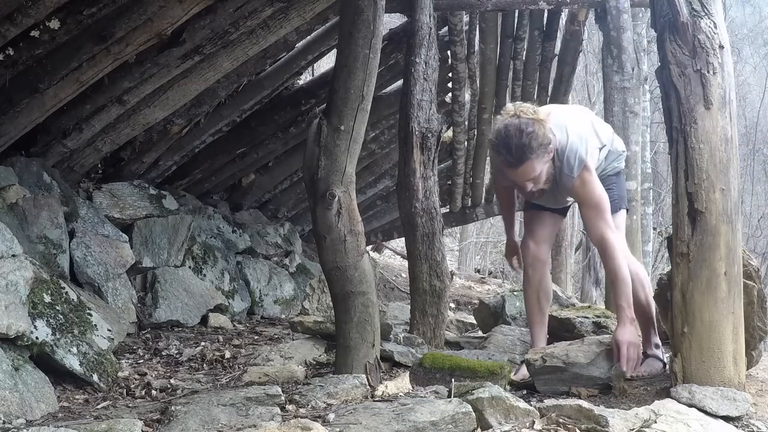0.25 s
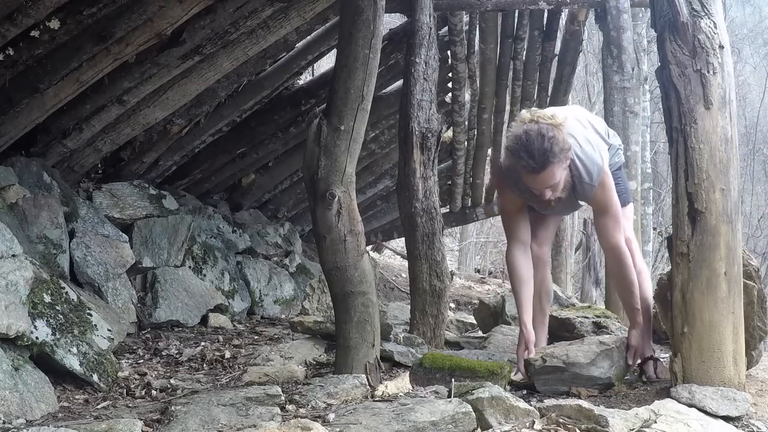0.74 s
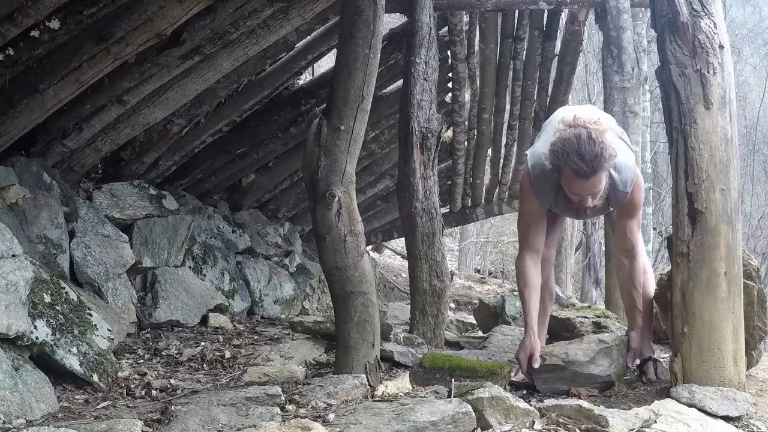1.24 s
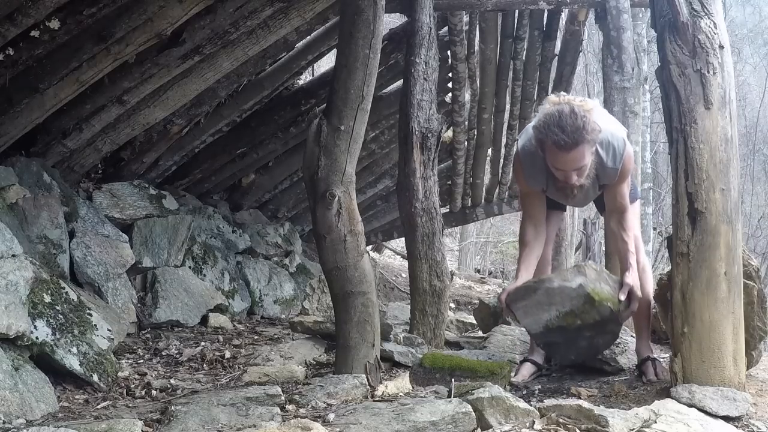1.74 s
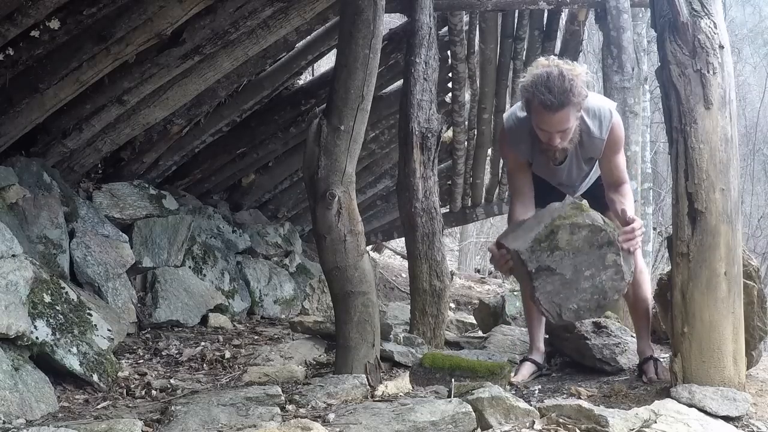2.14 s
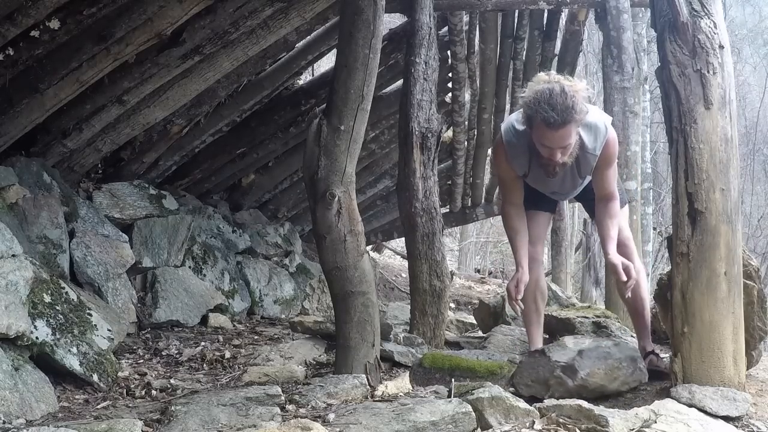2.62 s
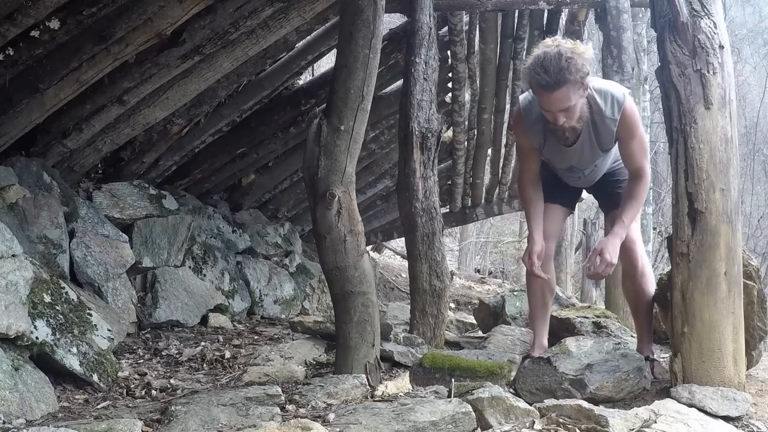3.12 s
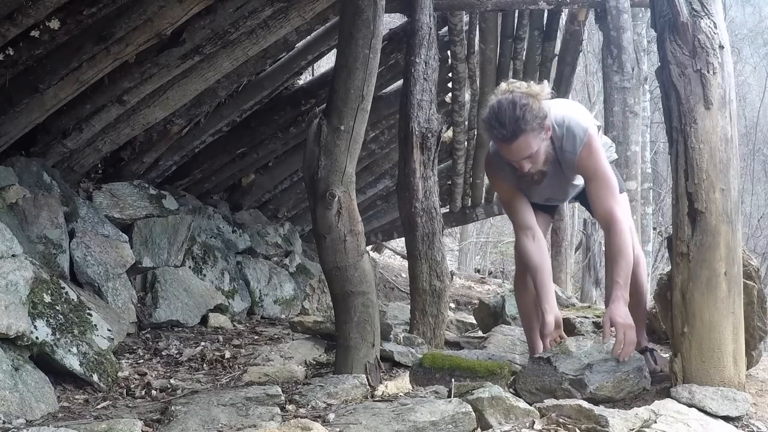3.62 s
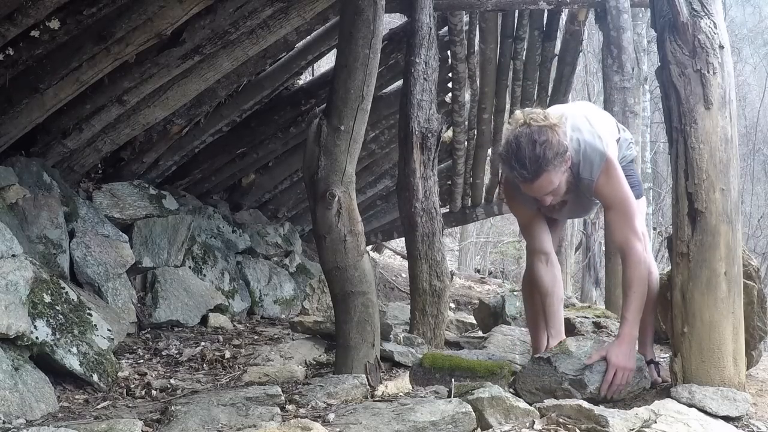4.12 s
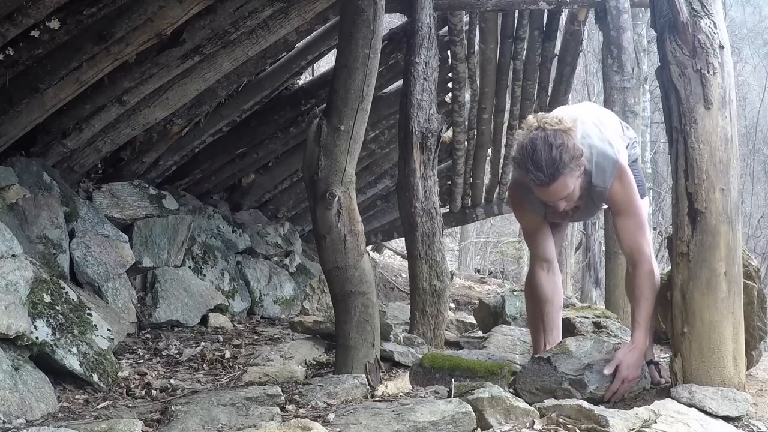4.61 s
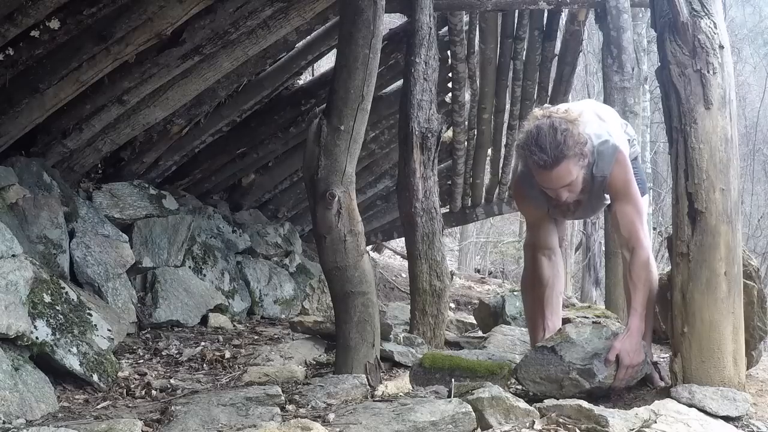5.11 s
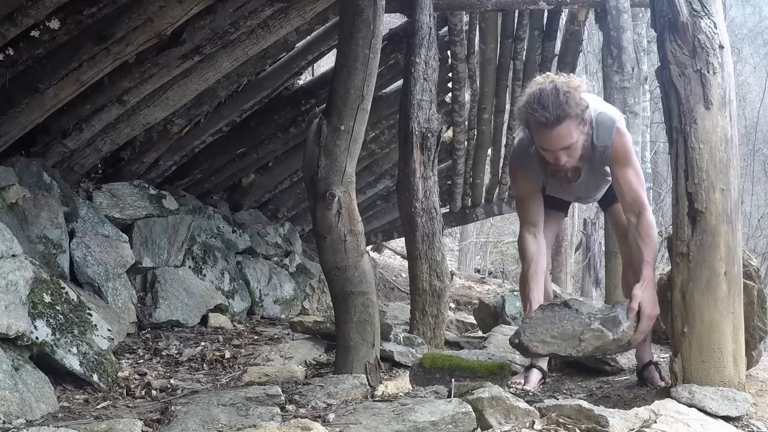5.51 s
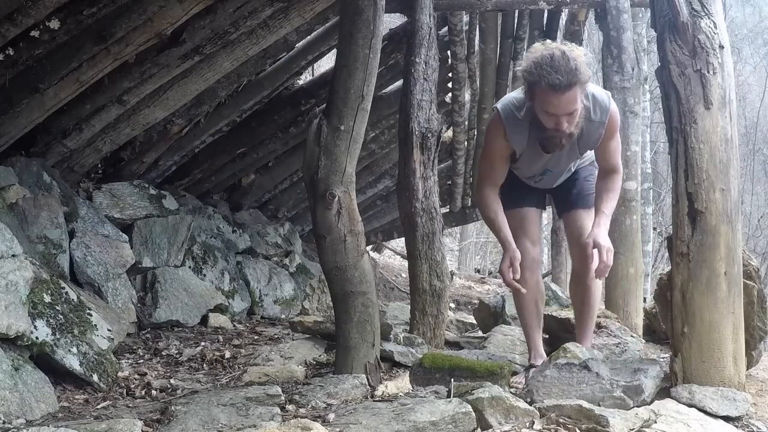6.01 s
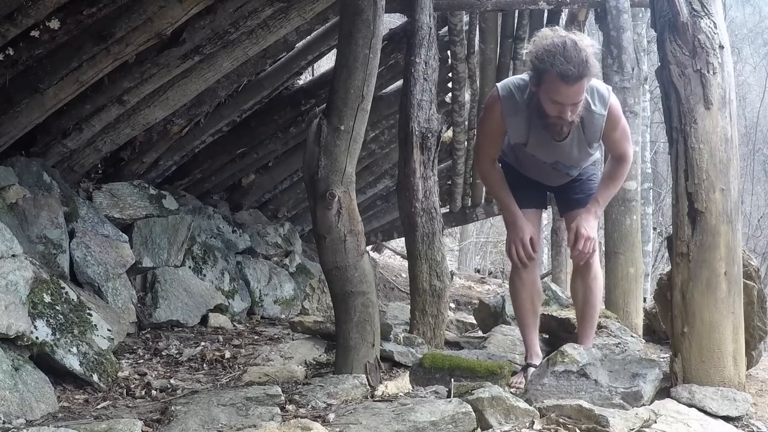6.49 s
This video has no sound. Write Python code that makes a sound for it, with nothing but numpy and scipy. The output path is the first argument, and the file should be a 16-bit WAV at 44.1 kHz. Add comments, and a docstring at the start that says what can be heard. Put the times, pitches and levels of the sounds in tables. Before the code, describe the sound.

A heavy stone falls twice onto flat rocks and gritty soil with sharp knocks and crunches, over quiet forest air.

```python
"""Heavy stone tipped over

A heavy stone falls twice onto flat rocks and gritty soil under a lean-to of logs. Each fall crunches
into the grit, knocks a short ring out of a slab and shakes the ground; the stone rocks and settles.
Sandals shuffle and pebbles tick; far birds whistle over quiet forest air and a faint electronic whine."""
import sys
import numpy as np
from scipy import signal
from scipy.fft import rfft, irfft
from scipy.io import wavfile

SR = 44100
rng = np.random.default_rng(int(sys.argv[2]) if len(sys.argv) > 2 else 0)


def int16_out(signal):
    """Quantize to a 16-bit WAV file."""
    q = np.round(np.clip(np.atleast_2d(signal).T, -1, 1) * 32767)
    wavfile.write(sys.argv[1], SR, q.astype(np.int16))


N = 297675
TIME = np.arange(N) / SR
AGE = TIME[:SR]  # the first second after a blow

# the stone hits a slab: (time [s], ring [dB], crack [dB], base crack t60 [s], snap [dB])
SLAB_HITS = [(2.3756, -19.5, -21.5, 0.07, -12), (5.7333, -28.5, -34, 0.072, -42)]
# ring of the slab, one set of modes per hit: (frequency [Hz], relative level [dB], t60 [s])
SLAB_MODES = [
    [(620, -19.5, 0.084), (854, -9, 0.039), (937, -0.5, 0.034), (1054, 3.5, 0.036), (1204, -21, 0.13),
     (2040, -5.5, 0.038), (2150, -11, 0.023), (2510, -11.5, 0.066), (3366, -4, 0.038), (3810, -6.5, 0.055),
     (5090, -13.5, 0.085), (5150, -3, 0.025), (6430, -1, 0.02), (8050, -18, 0.061)],
    [(419, -11, 0.14), (883, 6, 0.022), (1228, 2.5, 0.038), (1544, -6, 0.083), (1860, -22, 0.071),
     (1940, -17, 0.044), (2470, -10, 0.045), (2820, -5, 0.037), (3052, -7, 0.036), (3800, -5.5, 0.032)],
]
# EQ of each crack, a sharp edge first, then a blunt face: (frequency [Hz], relative level [dB])
CRACK_EQS = [
    [(100, -8), (400, -5.5), (1000, 5.5), (1500, -5.5), (2200, -5), (4000, -6), (6300, -4), (7200, -6),
     (8700, 1), (10300, -10), (15000, -11.5)],
    [(100, -1), (400, 2.5), (1400, 2), (2300, -2.5), (3600, -18), (5500, -22), (8500, -29), (10300, -29),
     (15000, -26)],
]
# the stone's own modes, a snap at first contact: (frequency [Hz], relative level [dB], t60 [s])
SNAP_MODES = [(3950, -3.5, 0.0072), (4930, 4, 0.0028), (6390, -1.5, 0.0058), (8230, -4, 0.011),
              (13160, -8.5, 0.0078)]
def knocks(crack_attack_s=0.00057, ring_attack_s=0.0025):
    """Stone on stone: a snap, a crack thickened by the close walls, and the short ring of the slab."""
    out = np.zeros(N)
    for (s, ring_db, crack_db, t60, snap_db), modes, eq in zip(SLAB_HITS, SLAB_MODES, CRACK_EQS):
        noise = colour(rng.standard_normal(SR), eq)
        body = signal.sosfilt(signal.butter(1, 4000, fs=SR, output="sos"), noise)
        crack = body * fade(1.63 * t60) + (noise - body) * fade(0.51 * t60)  # the treble dies first
        transient = undb(crack_db) * crack + undb(snap_db) * ring(SNAP_MODES)
        add(out, s, transient * attack(crack_attack_s))
        add(out, s, undb(ring_db) * ring(modes) * attack(ring_attack_s))
    return out


# the weight sinks into the soil: (time [s], wobble [dB], bounce [dB], bounce pitch [Hz], thump [dB])
FALLS = [(2.367, -29.5, -34, 52, -28), (5.736, -31, -29, 56, -37.5)]
# thump of packed soil: (frequency [Hz], relative level [dB], t60 [s])
THUMP_MODES = [(99, -8, 0.21), (128, -4.5, 0.12), (168, 1.5, 0.065), (200, -4, 0.033)]
# sub-bass wobble of the microphone stand: (frequency [Hz], relative level [dB], t60 [s])
STAND_MODES = [(29.76, 3, 0.39), (26.14, -9.5, 1.1), (44.3, -34, 2.1)]
def ground(attack_s=0.0038, bounce_t60=0.25):
    """The low end: each fall thumps the soil, which springs back, and jolts the microphone stand."""
    out = np.zeros(N)
    for s, wobble_db, bounce_db, bounce_hz, thump_db in FALLS:
        thump = undb(thump_db) * ring(THUMP_MODES)
        wobble = undb(wobble_db) * ring(STAND_MODES)
        bounce = ring([(bounce_hz, bounce_db, bounce_t60)])
        add(out, s, attack(attack_s) * (thump - wobble - bounce))
    return out


# the hollow under the stone: (frequency [Hz], relative level [dB], t60 [s])
HOLLOW_MODES = [(343, -6, 0.12), (390, 0, 0.057), (433, -8.5, 0.076), (540, -10.5, 0.083)]
def belly_bump(start_s=5.8192, level_db=-26, closing_s=0.017, choke_db=-7, attack_s=0.00034):
    """The stone rocks back onto its belly with a hollow bump, choked as the gap below it closes."""
    out = np.zeros(N)
    closed = 1 - np.exp(-(AGE / closing_s) ** 4)
    hollow = sum(ring([mode]) for mode in HOLLOW_MODES)  # all modes start in phase
    add(out, start_s, undb(level_db + choke_db * closed) * attack(attack_s) * hollow)
    return out


# the stone crushes grit, fast in, slow out: (time [s], level [dB], tilt [dB/octave], t60 [s])
CRUNCHES = [(1.341, -68.5, 6, 0.18), (1.405, -61.5, 5, 0.1), (2.361, -37, 1, 0.29), (2.764, -59, 0, 0.4),
            (5.719, -47.5, -0.4, 0.98), (5.805, -44, -0.5, 0.24)]
# sandals and stone slide over grit: (peak time [s], length [s], level [dB], tilt [dB/octave])
SCRAPES = [(0.073, 0.15, -65, -1.5), (0.453, 0.5, -70.5, -2), (1.74, 0.21, -64, -1),
           (2.152, 0.06, -59.5, 1.5), (2.315, .16, -68, 2), (2.584, 0.19, -57.5, 2), (2.667, 0.13, -58, -2),
           (3.485, 0.9, -68, -1.5), (4.875, 0.17, -70, -1), (5.637, 0.086, -55.5, 1.5),
           (5.916, 0.16, -56, -1.4), (6.122, 0.084, -55, -1.5), (6.252, 0.53, -64.5, -1.9)]
def grit_moves(crunch_attack_s=0.0021, edge_db=-6.5, swell_shape=1.35):
    """How hard each crunch and scrape works the grit, as (start time, envelope, tilt)."""
    moves = [(s, undb(db) * attack(crunch_attack_s) * fade(t60), tilt) for s, db, tilt, t60 in CRUNCHES]
    for s, length, db, tilt in SCRAPES:
        t = TIME[abs(TIME - s) < 2 * length]
        from_peak = abs(2 * (t - s) / length)
        swell = undb(db + edge_db * from_peak ** swell_shape)  # shape 1 is pointed, 2 is round
        moves.append((t[0], swell, tilt))
    return moves


# EQ of the grit: (frequency [Hz], relative level [dB])
GRIT_EQ = [(60, -6.5), (300, -6.5), (1000, 1.5), (2000, 0.5), (4000, -1), (6500, -5), (8800, -3),
           (10500, -12), (15000, -10.5)]
def grit(grains_per_s=1400, scatter_db=2.5, pivot_hz=3500):
    """Dense tiny cracks of sand and dry leaves; loose grains sound brighter than packed soil."""
    sizes = undb(scatter_db * np.minimum(rng.exponential(size=N), 5)) * rng.choice([-1, 1], N)
    grains = unit(sizes * (rng.random(N) < grains_per_s / SR))
    spectrum = rfft(colour(grains + rng.standard_normal(N), GRIT_EQ))
    octave = np.log2(np.clip(np.fft.rfftfreq(N, 1 / SR), 250, 16000))
    out, moves = np.zeros(N), grit_moves()
    # each octave band rides its own envelope, so every move has its own brightness
    for centre in np.arange(octave[0], octave[-1] + .5):
        texture = irfft(spectrum * np.maximum(1 - abs(octave - centre), 0), N)
        power = np.zeros(N)
        for s, envelope, tilt in moves:
            add(power, s, (envelope * undb(tilt * (centre - np.log2(pivot_hz)))) ** 2)
        out += texture * np.sqrt(power)
    return out


# pebbles, twigs and shifts of the stone: (time [s], level [dB], centre [Hz], width [octaves], t60 [s])
TICKS = [(0.554, -54, 1880, .9, 0.075), (1.339, -53, 535, 1.5, 0.17), (1.403, -54.5, 690, 1.6, 0.14),
         (1.423, -56, 900, 0.99, .06), (2.292, -48, 5140, 2.2, 0.024), (2.3063, -46, 4870, 1.14, .065),
         (2.361, -37, 720, 2, 0.12), (2.387, -30, 1100, 3, 0.03), (2.403, -34.5, 1310, 3.3, 0.07),
         (2.486, -48, 516, 1.85, 0.19), (2.494, -50, 1000, 0.62, 0.053), (2.625, -50, 3230, 1.8, .04),
         (2.672, -50, 1040, 2, 0.17), (2.754, -52.5, 6000, 3.5, 0.057), (2.765, -48.5, 1080, 1.2, 0.05),
         (2.977, -63, 6050, 1.3, 0.064), (3.369, -58, 2390, 1.9, 0.11), (3.509, -53.5, 2830, 2.3, 0.12),
         (3.766, -56, 1950, 1.2, 0.094), (4.052, -63, 3380, 1, 0.068), (5.742, -36.5, 2620, 1.4, 0.045),
         (5.788, -38, 386, 0.95, 0.064), (5.8165, -40.5, 900, 1.3, 0.078), (5.882, -43.5, 2730, 1.4, .028),
         (5.922, -48.5, 443, 2.5, 0.061), (6.191, -46.5, 1600, 1.46, 0.059), (6.421, -62.5, 5000, 2, 0.14)]
def ticks(litter_count=12, litter_db=-67.5, litter_hz=2600, litter_octaves=1.6, litter_t60=0.066):
    """Small contacts: brief bursts, higher for smaller pieces; faint litter ticks at random."""
    out = np.zeros(N)
    litter = [(when * TIME[-1], litter_db + 2 * size, litter_hz * 2 ** (pitch - .5),
               litter_octaves, litter_t60) for when, size, pitch in rng.random((litter_count, 3))]
    for s, db, hz, octaves, t60 in TICKS + litter:
        envelope = attack(1 / hz) * fade(t60)  # bigger, lower pieces speak more slowly
        add(out, s, undb(db) * band(SR, hz, octaves) * envelope)
    return out


# the stone is heaved over: (time [s], length [s], start pitch [Hz], end pitch [Hz], level [dB])
RASPS = [(1.67, .18, 2150, 2414, -71), (5.575, 0.072, 1600, 3020, -61.5)]
def rasps(width_octaves=0.2):
    """The stone's rough edge scrapes with a resonance that rises as it speeds up."""
    return glides(RASPS, width_octaves)


def shelter(x, wet_db=-23, t60=0.2, build_s=0.0014):
    """Logs and dry-stone wall scatter a short, dull tail."""
    tail_eq = [(80, 4.5), (500, -1.5), (3000, -15.5), (8000, -5.0), (15000, -18)]
    tail = colour(rng.standard_normal(SR), tail_eq) * fade(t60) * attack(build_s)
    return x + undb(wet_db) * signal.fftconvolve(x, tail / np.linalg.norm(tail))[:N]


# far bird calls: (time [s], length [s], start pitch [Hz], end pitch [Hz], level [dB])
BIRD_CALLS = [(0.117, 0.12, 2570, 2800, -72), (0.075, 0.49, 4320, 4240, -79),
              (0.149, 0.75, 1640, 1635, -79), (3.212, 0.27, 4200, 4300, -78), (3.794, 0.1, 3150, 3700, -80),
              (5.901, 0.62, 3180, 3230, -74.5), (6.38, 0.58, 5620, 5840, -80)]
def birds(smear_octaves=0.029):
    """Thin gliding whistles, smeared by their way through the trees."""
    return glides(BIRD_CALLS, smear_octaves)


# partials of the whine: (harmonic [number], level [dB])
WHINE_HARMONICS = [(1, -81.5), (2, -81.5), (3, -80.5)]
def whine(pitch_hz=4744, waver=0.012, waver_hz=45):
    """A thin electronic whine whose pitch trembles."""
    pitch = pitch_hz * (1 + waver * band(N, waver_hz, octaves=2.35))
    phase = 2 * np.pi * np.cumsum(pitch) / SR
    return sum(undb(db) * unit(np.sin(k * phase)) for k, db in WHINE_HARMONICS)


# EQ of the forest bed: (frequency [Hz], relative level [dB])
AIR_EQ = [(12, -38), (20, 3), (54, 0), (139, -5.5), (263, -10), (294, -10), (387, -9.5), (1270, -12),
          (3090, -19), (4690, -21.5), (5240, -22), (9370, -21), (10800, -22.5), (15000, -20.5)]
def forest_air(level_db=-67):
    """Still forest air: a steady bed of noise, heaviest in the lows."""
    return undb(level_db) * colour(rng.standard_normal(N), AIR_EQ)


# EQ of the stereo hiss: (frequency [Hz], relative level [dB])
HISS_EQ = [(12, -27), (20, 6.5), (294, 3.5), (433, 5.5), (1510, -5), (3860, 1.5), (11100, 1.5),
           (15000, -39)]
def wide_hiss(level_db=-82):
    """A trace of hiss, opposite in polarity left and right, for width."""
    return undb(level_db) * colour(rng.standard_normal(N), HISS_EQ) * np.array([[1], [-1]])


def undb(db):
    """Decibels to gain."""
    return 10 ** (np.asarray(db) / 20)


def unit(x):
    """Scale to rms 1."""
    return x / np.sqrt(np.mean(x ** 2))


def attack(rise_s):
    """Rise from 0 towards 1 with time constant rise_s."""
    return 1 - np.exp(-AGE / rise_s)


def fade(t60):
    """Exponential decay, 60 dB down after t60 seconds."""
    return np.exp(-np.log(1000) * AGE / t60)


def add(out, s, x):
    """Mix x into out from time s."""
    start = int(s * SR)
    out[start:start + len(x)] += x[:N - start]


def colour(x, eq):
    """Filter by an EQ curve of (frequency [Hz], relative level [dB]); rms 1."""
    hz, db = np.transpose(eq)
    f = np.maximum(np.fft.rfftfreq(len(x), 1 / SR), 1)
    gain = undb(np.interp(np.log(f), np.log(hz), db))
    return unit(irfft(rfft(x) * gain, len(x)))


def band(size, hz, octaves):
    """Noise in a bell-shaped band; rms 1."""
    f = np.maximum(np.fft.rfftfreq(size, 1 / SR), 1)
    bell = 1 / (1 + (np.log2(f / hz) / octaves) ** 2) ** 2
    return unit(irfft(rfft(rng.standard_normal(size)) * bell, size))


def ring(modes):
    """Damped modes after one blow; neighbours swing in opposite senses."""
    return sum((-1) ** k * undb(db) * fade(t60) * np.sin(2 * np.pi * hz * AGE)
               for k, (hz, db, t60) in enumerate(modes))


def glides(rows, octaves, carrier_hz=4000):
    """Narrow noise bands, made at the carrier and shifted along a pitch slide, that swell and fade."""
    out = np.zeros(N)
    for s, length, start_hz, end_hz, db in rows:
        size = int(length * SR)
        smear = signal.hilbert(band(SR, carrier_hz, octaves))[:size]
        shift_hz = np.linspace(start_hz, end_hz, size) - carrier_hz
        slide = np.exp(2j * np.pi * np.cumsum(shift_hz) / SR)
        swell = np.sin(np.linspace(0, np.pi, size))
        add(out, s, undb(db) * (smear * slide).real * swell)
    return out


def scene():
    """Stone, grit and forest sit in the centre; only the hiss is wide."""
    foley = shelter(knocks() + belly_bump() + ticks() + grit() + rasps())
    return foley + ground() + birds() + whine() + forest_air() + wide_hiss()


def record(dry, cutoff_hz=15200):
    """A steep low-pass trims the very top of the mix."""
    return signal.sosfilt(signal.ellip(10, .2, 70, cutoff_hz, fs=SR, output="sos"), dry)


dry = scene()
out = record(dry)
int16_out(out)
```